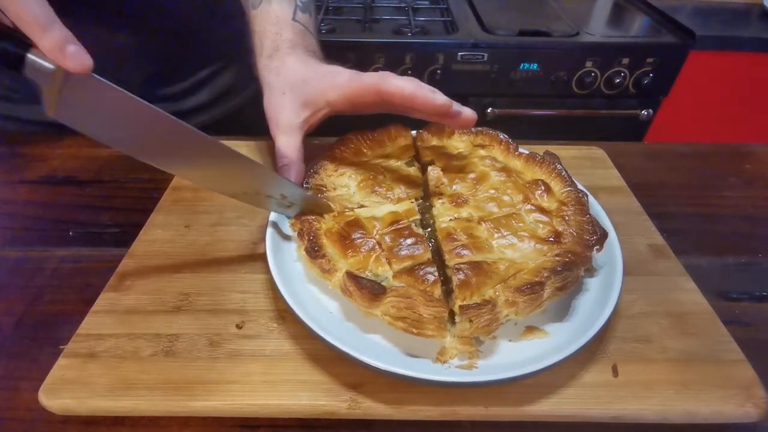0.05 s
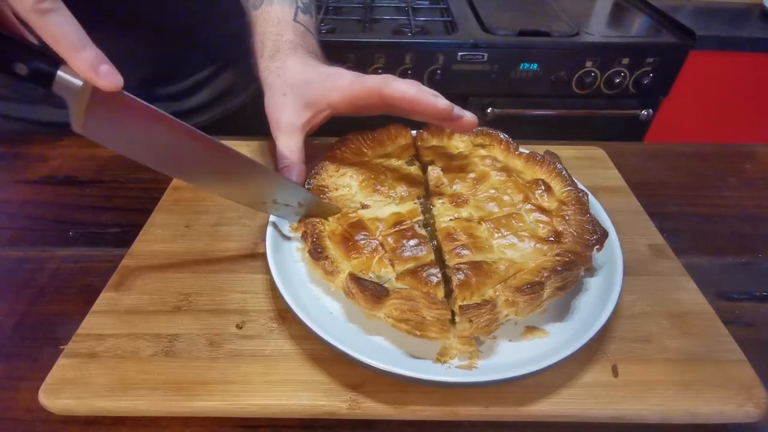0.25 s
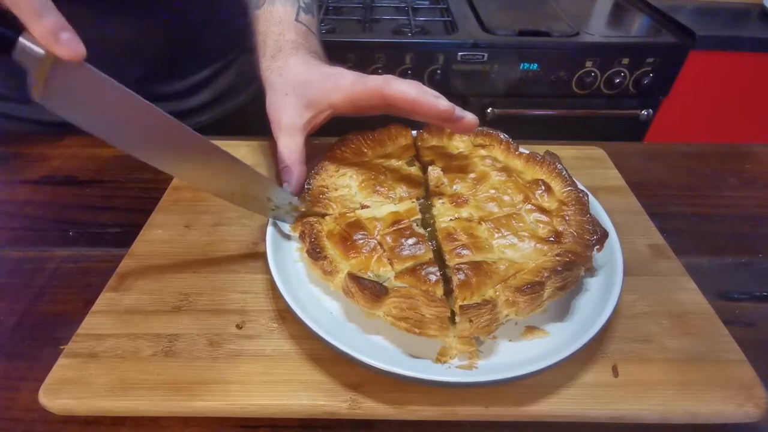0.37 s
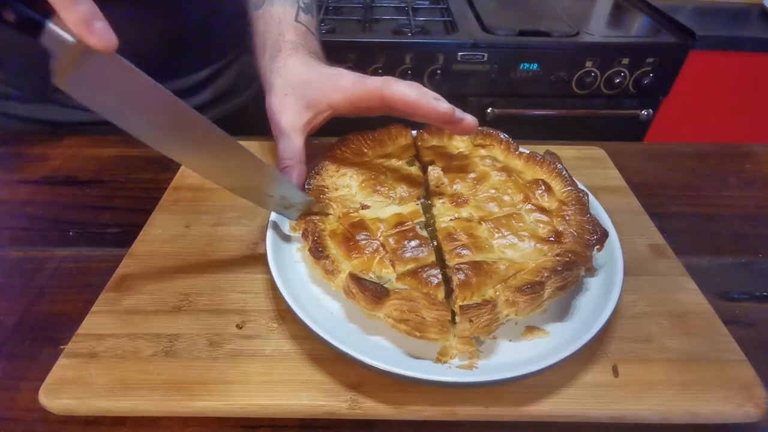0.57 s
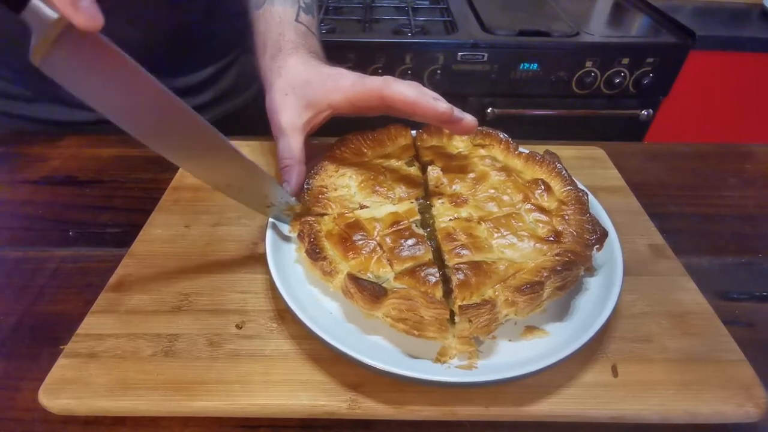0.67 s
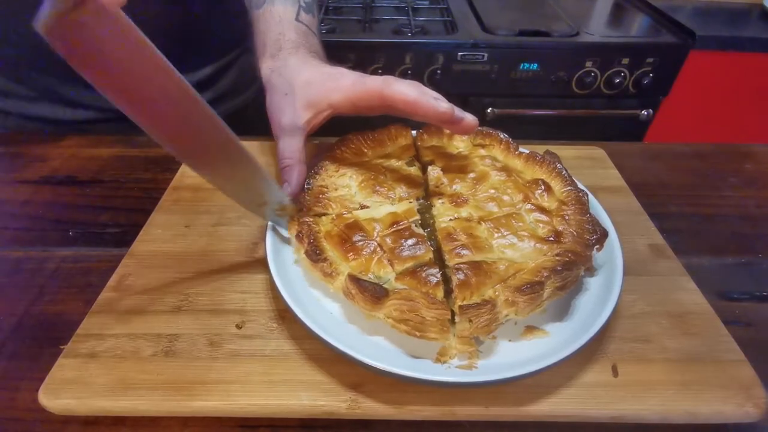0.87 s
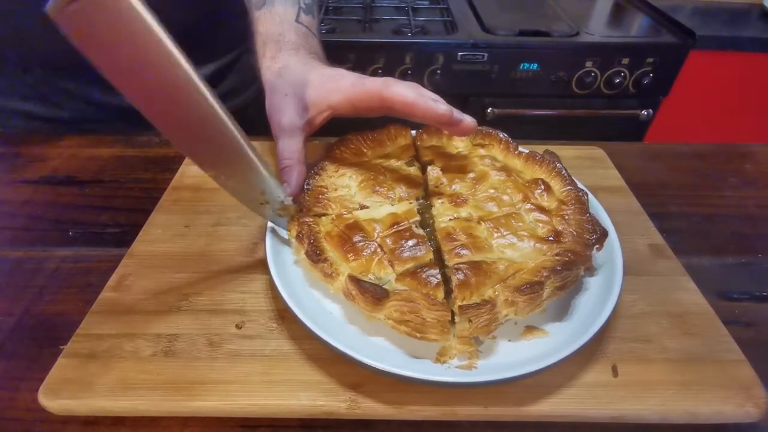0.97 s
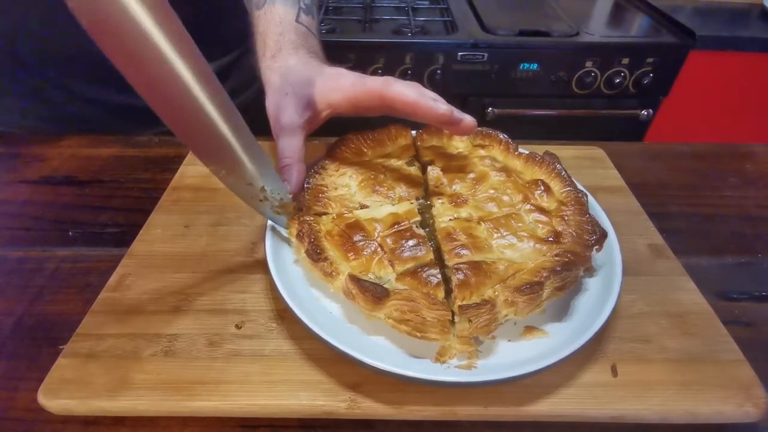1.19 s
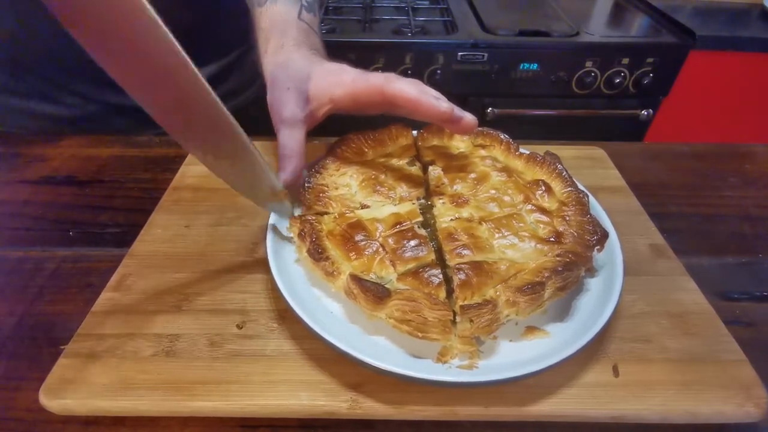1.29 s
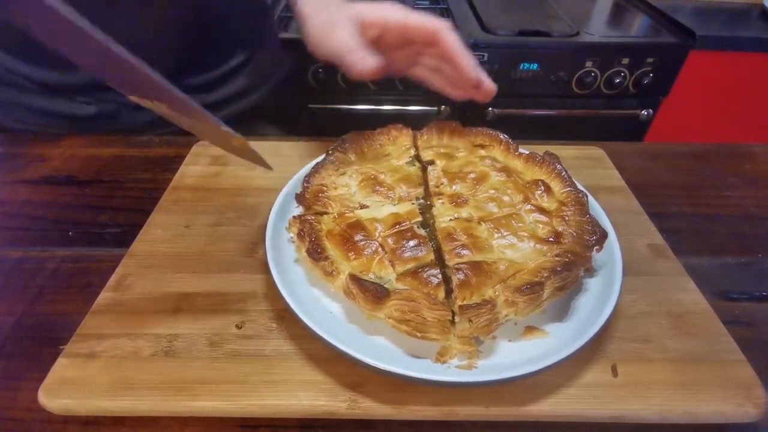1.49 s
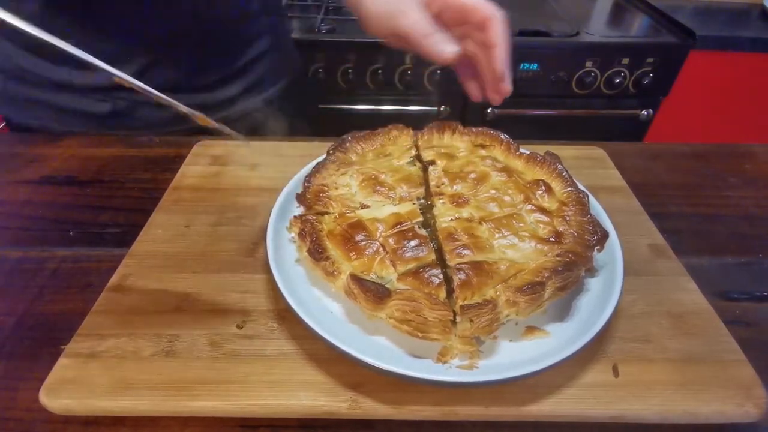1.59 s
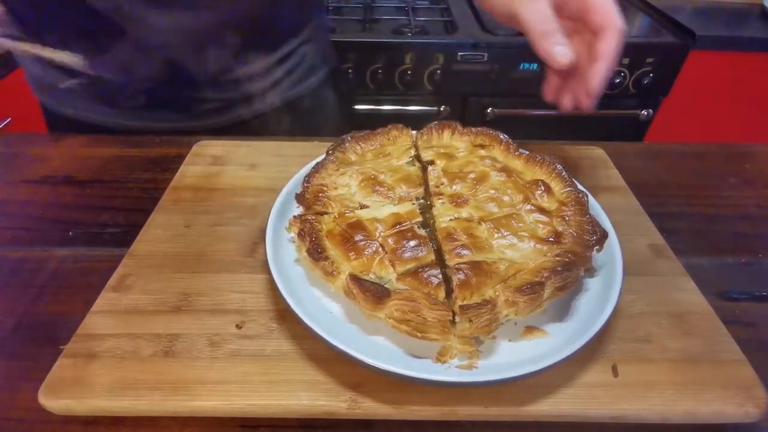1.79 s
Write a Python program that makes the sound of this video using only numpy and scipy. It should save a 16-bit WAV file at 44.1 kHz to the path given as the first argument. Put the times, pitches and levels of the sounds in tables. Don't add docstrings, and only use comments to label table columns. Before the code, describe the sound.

Knife cutting a flaky pie on a ceramic plate, close stereo in a reverberant kitchen. A tiny tick at 0.08 s, crust crackles around 0.2 s, dull plate bumps at 0.25-0.45. A light touch at 0.5, a sharp clink at 0.56, then uneven gritty scraping to 1.0, with a blunt bump at 0.85. Crunch and hard clack at 1.01, fading; faint flakes near 1.4 over low rumble and hum.

```python
import sys
import numpy as np
from scipy import signal
from scipy.fft import rfft, irfft, next_fast_len
from scipy.io import wavfile
from scipy.ndimage import map_coordinates

SR = 44100
rng = np.random.default_rng(int(sys.argv[2]) if len(sys.argv) > 2 else 0)


def to_linear_factor(level_db):
    exponent = np.asarray(level_db, float) / 20
    return 10 ** exponent


def generate_wav(sig):
    pcm = np.round(np.clip(np.atleast_2d(sig).T, -1, 1) * 32767).astype(np.int16)
    wavfile.write(sys.argv[1], SR, pcm)


N = 81585

# frequency in Hz, level struck near the rim in dB,
# level struck further in in dB, t60 in seconds, left over right in dB.
PLATE_MODES = [(284.5, -12.5, -26.5, 0.16, 2.5), (630, -23, -8.5, 0.12, -4.5), (568.4, 0, -10, 0.09, -4),
               (716, 3.5, -5.5, 0.14, -3.5), (722, -6, 0.5, 0.065, 0), (878, -26, -10, 0.024, -10.5),
               (992, 2.5, -42, 0.025, -2.5), (1622, -5.5, -3.5, 0.091, -2), (1866, 6.5, -9.5, 0.045, 2),
               (1972, 4, -4, 0.036, -13.5), (2100, -9.5, 4.5, 0.074, 1), (2427, 4.5, -7, 0.026, -8),
               (3020, 3.5, -5, 0.015, -12.5), (2880, 5, -8.5, 0.04, -2), (3161, -3.5, -9.5, 0.1, 12.5)]
# frequency in Hz, level in dB,
# t60 in seconds, left over right in dB.
JAMMED_MODES = [(218, -12.5, 0.02, 5), (626.8, -6.5, 0.11, -4.5), (694.3, -2.5, 0.083, -7.5),
                (786, -0.5, 0.051, -3.5), (791, -1.5, 0.026, 0), (1130, -26, 0.028, -4),
                (1593, -4.5, 0.055, -2), (1815, 5, 0.015, 0), (1919, -5.5, 0.058, -8),
                (2170, 0, 0.03, -7.5), (2320, -3.5, 0.066, -4.5), (2760, 0.5, 0.01, 6),
                (3012, -2, 0.027, -14.5), (3140, 0.5, .03, -1)]
# frequency in Hz, level in an early hold in dB, level in a late hold in dB,
# t60 in seconds, left over right in dB.
BLADE_MODES = [(3960, 2.5, -8, 0.01, -15), (4600, 9, -32.5, 0.018, 1.5), (4765, -6.5, 3, 0.022, 7),
               (6010, -4.5, -14.5, 0.045, -6), (6280, -6.5, -16.5, 0.04, -6.5),
               (7710, -21.5, -29.5, 0.025, -22), (9530, -7.5, -20.5, 0.03, -1),
               (11300, -12.5, -23, 0.028, -12), (12900, -12, -15, .025, -9.5),
               (13450, -13.5, -14.5, .025, -4.5), (15100, -11.5, -11.5, .025, -2.5)]
# frequency in Hz, level in dB, t60 in seconds.
BOARD_MODES = [(143.4, -31.5, .1), (200, -22, 0.15)]
# frequency in Hz, level in dB.
CLATTER_SPECTRUM = [(300, -34.5), (600, -4), (1000, -19), (1330, -31), (1900, 5.5), (3150, 1), (3500, -5),
                    (6800, -14.5), (8000, -48)]
CLATTER_DB, CLATTER_T60 = -2.5, 0.11
DULL_DB = 21
LAG_S, STRAY_HZ = -0.00013, 1450
# start in seconds, force in dB, contact in ms, blade over plate in dB,
# place from 0 at the rim to 1 inside.
KNOCKS = [
    (0.496, -28, 0.14, -6, 0.89),
    (.505, -44, 0.088, -30, 0.37),
    (.558, -22.5, 0.037, -3.5, 0.039),
    (0.5675, -30, .13, -16.5, 0.18),
]
# start in seconds, force in dB, contact in ms,
# blade over plate in dB.
BREAKS = [
    (1.0115, -19.5, 0.032, 1),
    (1.038, -27.5, 0.15, -17.5),
]
# time in seconds, pressure in dB, contact in ms,
# bearing point from 0 at the heel to 1 at the tip.
DRAG_COURSE = [(.48, -110, .07, .3), (.5, -72.5, 0.067, 0.29), (.52, -48, 0.079, 0.25),
               (.56, -42.5, 0.3, 0.32), (.68, -38.5, 0.13, 0), (.74, -32, 0.24, 0.74),
               (.78, -44.5, 0.095, 0.16), (.835, -39, 0.86, 0.5), (.9, -48, 0.68, 0.85),
               (.94, -45, 0.6, 0.7), (.965, -30, 0.6, .95), (.99, -33, .55, .96), (1.01, -36, 0.4, 0.76),
               (1.06, -50, 0.07, 0), (1.2, -68, 0.092, 0.5), (1.3, -86, 0.13, 0.75)]
DRAG_CATCHES_PER_S, DRAG_SPREAD_DB = 900, 3.5
DRAG_BLADE_DB, DRAG_CLATTER_DB = -5.5, 1
# frequency in Hz, heel level in dB, # tip level in dB,
# t60 in seconds. With the heel down a mode sounds at 1.5 times the heel level
ROCKING_MODES = [(208, -25, -20, 0.019), (260, -15, -18.5, 0.076), (622, -10, -2, 0.053),
                 (697, -2, -9, 0.051), (726, -13.5, -2, 0.044), (1080, -6, -7, 0.038),
                 (1150, -5.5, -18, 0.02), (1618, -2.5, -3.5, 0.016), (1647, -12.5, 4.5, 0.026),
                 (1840, -17, -5, 0.028), (1950, -23, -10.5, 0.064), (2955, -21, -6, 0.033),
                 (4030, -19.5, -6.5, .014)]
# start in seconds, force in dB, pitch in Hz, rise in ms, scuff in dB.
SHOVES = [(.2462, -18.5, 701.6, 3, 2), (.279, -24.5, 703, 4, -10), (.298, -28.5, 693, 4, -15.5),
          (.422, -32, 710, 14, -24.5), (.455, -52.5, 715, 8, -20), (.33, -37, 712, 6, -20.5),
          (.832, -55.5, 780, 4, -17), (.8525, -14.5, 748, 16, -24), (.872, -45, 700, 4, -15.5),
          (.886, -29.5, 707, 5, -22.5), (.918, -42, 695, 5, -20.5), (.94, -22.5, 765, 14, -24)]
# frequency over the pitch, level in dB, t60 in seconds,
# left over right in dB.
SHOVED_MODES = [(0.382, -15.5, .05, -2), (.78, -7.5, 0.0406, -3.5), (0.971, -3, 0.029, -1.5),
                (1.002, 0, .075, -5.5), (1.04, -12.5, 0.02, -0.5), (1.44, -20, .03, -3.5)]
# frequency in Hz, level in dB.
SCUFF_SPECTRUM = [(250, -13.5), (550, -8.5), (1150, -10.5), (1350, -12), (1650, 2.5), (2300, 1.5),
                  (3100, -14), (8000, -33)]
SCUFF_MS, SCUFF_T60 = 0.016, 0.052
# time in seconds, strength in dB.
CRUSH_COURSE = [(0, -64), (.19, -68), (.225, -49), (.3, -48.5), (.35, -80.5), (.43, -56), (.49, -77),
                (.548, -48), (.6, -57.5), (.7, -67), (.77, -53), (.8, -61.5), (.92, -75.5), (.985, -45.5),
                (1.04, -52.5), (1.3, -74), (1.4, -70), (1.46, -80.5)]
FLAKES_PER_S, FLAKE_SPREAD_DB, FIZZ_SHARE = 4500, 4.5, 1
# start in seconds, peak in dB.
SNAPS = [(0.1599, -51), (0.2028, -45), (0.2048, -50), (0.22, -47.5), (0.2259, -53), (0.2327, -43),
         (.2365, -42), (.375, -48), (0.5424, -45), (0.5462, -38), (0.7336, -46), (0.7374, -46),
         (0.772, -36), (0.9522, -47.5), (0.9832, -37.5), (0.9864, -37), (1.367, -52), (1.3924, -48),
         (1.4157, -51)]
SNAP_T60 = .012
# frequency in Hz, level in dB.
CRUST_SPECTRUM = [(1200, -30), (2500, 3.5), (4000, 1.5), (6000, 1), (8000, -16), (11000, 0), (13500, -15),
                  (16000, -14)]
# frequency in Hz, level in dB.
TIP_MODES = [(3000, -20), (4651, -14.5), (5480, -11.5), (11420, -24), (15100, -30)]
TICK_S, TICK_DB, TIP_T60 = .0752, -42.5, .1
# frequency in Hz, t60 in seconds, level in dB.
KITCHEN = [(154, 1, -3.5), (754, 0.5, -4.5), (2100, 0.56, -1.5), (5000, .5, -6.5), (11940, 0.28, -3.5)]
# frequency in Hz, left-right likeness.
ECHO_ALIKE = [(100, 0.57), (700, 1), (1500, 0.31), (4000, 0.073)]
WARE_WET_DB, SHOVE_WET_DB, CRUST_WET_DB = -1.55, -3.5, -1.5
WALL_S = .006
# frequency in Hz, level in dB.
RUMBLE = [(25, -4), (60, 1.5), (130, -10.5), (260, -16.5), (500, -63)]
# time in seconds, effort in dB.
HANDS = [
    (0, -76),
    (.22, -80),
    (.28, -61.5),
    (.45, -68.5),
    (.6, -72.5),
    (1.05, -73.5),
    (1.28, -66.5),
    (1.35, -91),
]
# frequency in Hz, level in dB.
AIR = [(30, -66.5), (90, -77.5), (350, -76.5), (800, -82), (2000, -88), (5000, -95.5), (8000, -103.5),
       (15000, -100)]
# frequency in Hz, left-right likeness.
AIR_ALIKE = [(60, 0.11), (240, 0.78), (950, 0), (3770, 0.0), (15000, 0.07)]
# frequency in Hz, rms level in dB.
HUM = [(148, -70.5), (340, -74)]
# resonance in Hz, width in Hz, lift in dB, roll-off in Hz.
PORTS = [(5150, 2000, 15, 19000), (10920, 4470, 20, 28000)]
TOP_HZ = 15850


def unit(x):
    return x / np.sqrt(np.mean(x ** 2) + 1e-20)


def along(points, hz):
    f, v = np.transpose(points)
    return np.interp(np.log(hz + 1), np.log(f + 1), v)


def curves(rows):
    s, *cols = np.transpose(rows)
    return [np.interp(np.arange(N) / SR, s, c) for c in cols]


def filtered(x, response):
    m = next_fast_len(N + SR // 2)
    return irfft(rfft(x, m) * response(np.fft.rfftfreq(m, 1 / SR)), m)[..., :N]


def causal(points):
    cep = irfft(np.log(to_linear_factor(along(points, np.fft.rfftfreq(2048, 1 / SR)))))
    cep[1:1024] *= 2
    cep[1025:] = 0
    return irfft(np.exp(rfft(cep)))[:512]


def spikes(rate, spread_db):
    u = rng.random((3, N))
    sign = np.sign(u[1] - .5)
    size = to_linear_factor(-spread_db * np.log(1 - .98 * u[2]))
    return unit((u[0] < rate / SR) * sign * size)


def ringing(modes, place, contact_ms, attack_s=.001):
    t = np.arange(SR // 4) / SR
    hz, near, far, t60, pan = np.transpose(modes)[:, :, None]
    place = np.clip(place, 0, 1)
    level = (1.5 - place) * near + place * far - 60 * t / t60
    size = to_linear_factor(level) / (1 + (hz * contact_ms / 500) ** 4) ** .5
    rise = 1 - np.exp(-t / max(attack_s, contact_ms / 250))
    common = rng.normal(0, 0.51, hz.shape)
    stray = np.minimum(hz / STRAY_HZ, 1) * rng.normal(0, 0.92, (2, len(modes), 1))
    lag = np.array([-1, 1])[:, None, None] * np.pi * hz * LAG_S
    wave = np.sin(2 * np.pi * hz * t + common + stray + lag)
    ring = rise * np.sum(size * to_linear_factor(np.array([pan, -pan]) / 2) * wave, axis=1)
    return signal.lfilter(*signal.butter(2, hz.min() / SR, 'high'), ring)


def clatter(db, contact_ms, t60=CLATTER_T60, modes=CLATTER_SPECTRUM):
    t = np.arange(SR // 4) / SR
    rise = 1 - np.exp(-t / (.0012 + contact_ms / 200))
    noise = rng.standard_normal(len(t)) + 0.33 * rng.standard_normal((2, len(t)))
    burst = rise * to_linear_factor(db - 60 * t / t60) * noise
    colour = [(hz, level - DULL_DB * contact_ms * max(np.log2(hz / 900), 0)) for hz, level in modes]
    return signal.fftconvolve(burst, causal(colour)[None], axes=1)[:, :len(t)]


def thump():
    return ringing([(hz, db, db, t60, 2) for hz, db, t60 in BOARD_MODES], 0, 0.21)


def knocks():
    out = np.zeros((2, N + SR))
    jammed = [(hz, db, db, t60, pan) for hz, db, t60, pan in JAMMED_MODES]
    blows = [(PLATE_MODES, row[4], *row) for row in KNOCKS]
    blows += [(jammed, 0, *row, .95) for row in BREAKS]
    for plate, place, s, db, ms, blade_db, hold in blows:
        blow = ringing(plate, place, ms) + thump()
        blow += to_linear_factor(blade_db) * ringing(BLADE_MODES, hold, 0.06)
        blow += clatter(CLATTER_DB - 12 * ms ** 2, ms)
        out[:, round(s * SR):][:, :SR // 4] += to_linear_factor(db) * blow
    return out[:, :N]


def drag():
    db, ms, tip = curves(DRAG_COURSE)
    force = to_linear_factor(db) * spikes(DRAG_CATCHES_PER_S, DRAG_SPREAD_DB)
    sharp = np.clip((.65 - ms) / 0.58, 0, 1) ** 2
    tip = np.clip(tip, 0, 1)
    hard = ringing(PLATE_MODES, 0.57, 0.32) + clatter(DRAG_CLATTER_DB, 0.058)
    hard += to_linear_factor(DRAG_BLADE_DB) * ringing(BLADE_MODES, 0.22, 0.098)
    rocking = [tuple(row) + (-2,) for row in ROCKING_MODES]
    heel_ring, tip_ring = (ringing(rocking, place, 0.039) for place in (0, 1))
    parts = ((sharp, hard), ((1 - sharp) * (1 - tip), heel_ring), ((1 - sharp) * tip, tip_ring))
    out = np.zeros((2, N))
    for share, ring in parts:
        ring = ring / np.linalg.norm(ring[1])
        out += signal.fftconvolve((force * share)[None], ring, axes=1)[:, :N]
    return out


def tick():
    t = np.maximum(np.arange(N) / SR - TICK_S, 0)
    ring = sum(to_linear_factor(db - 60 * t / TIP_T60) * np.sin(2 * np.pi * hz * t) for hz, db in TIP_MODES)
    crack = (t > 0) * to_linear_factor(-3.0 - 60 * t / 0.0042) * np.diff(rng.standard_normal((2, N + 1)))
    return to_linear_factor(TICK_DB) * (ring + crack)


def shoves():
    out = np.zeros((2, N + SR))
    for s, db, pitch, rise_ms, scuff_db in SHOVES:
        modes = [(pitch * k, level, level, t60, pan) for k, level, t60, pan in SHOVED_MODES]
        push = ringing(modes, 0, .01, rise_ms / 2000) + to_linear_factor(-8.5) * thump()
        push += clatter(scuff_db, SCUFF_MS, SCUFF_T60, SCUFF_SPECTRUM)
        out[:, round(s * SR):][:, :SR // 4] += to_linear_factor(db) * push
    return out[:, :N]


def crust():
    db, = curves(CRUSH_COURSE)
    fizz = FIZZ_SHARE * rng.standard_normal((2, N))
    force = to_linear_factor(db - 4.5) * (spikes(FLAKES_PER_S, FLAKE_SPREAD_DB) + fizz)
    t = np.arange(400) / SR
    fade = to_linear_factor(-60 * t / SNAP_T60) * (1 - np.exp(-t * 3000))
    for s, peak_db in SNAPS:
        snap = fade * np.diff(rng.standard_normal((2, len(t) + 1)))
        force[:, round(s * SR):][:, :len(t)] += to_linear_factor(peak_db + 1.5) * snap
    return signal.fftconvolve(force, causal(CRUST_SPECTRUM)[None], axes=1)[:, :N]


def kitchen(x, count=6):
    out, part = np.zeros((2, N)), np.arange(N) * count // N
    decay, colour = np.array(KITCHEN)[:, :2], np.array(KITCHEN)[:, ::2]
    for k in range(count):
        hz, t, (a, b) = signal.stft(rng.standard_normal((2, SR * 3 // 4)), SR, nperseg=256)
        turn = np.arccos(np.clip(along(ECHO_ALIKE, hz), -1, 1))[:, None] / 2
        z = np.array([a * np.cos(turn) + b * np.sin(turn), a * np.cos(turn) - b * np.sin(turn)])
        z = z * to_linear_factor(-60 * t / along(decay, hz)[:, None])
        tail = signal.istft(z, SR, nperseg=256)[1]
        tail = tail * (1 - np.exp(-np.arange(tail.shape[1]) / SR / 0.0052))
        tail = np.pad(tail / np.linalg.norm(tail[0]), ((0, 0), (round(WALL_S * SR), 0)))
        out += signal.fftconvolve(x * (part == k), tail, axes=1)[:, :N]
    return filtered(out, lambda f: to_linear_factor(along(colour, f)))


def worktop():
    db, = curves(HANDS)
    lumps = map_coordinates(rng.standard_normal(32), [np.arange(N) / SR * 14])
    rumble = unit(filtered(rng.standard_normal(N), lambda hz: to_linear_factor(along(RUMBLE, hz))))
    return to_linear_factor(db + 3 * lumps + np.array([[3], [-3]])) * rumble


def room_tone():
    def mid_side(hz):
        turn = np.arccos(np.clip(along(AIR_ALIKE, hz), -1, 1)) / 2
        return to_linear_factor(along(AIR, hz) + 21.5) * [np.cos(turn), np.sin(turn)]

    mid, side = filtered(rng.standard_normal((2, N)), mid_side)
    t = np.arange(N) / SR

    def slow():
        return map_coordinates(rng.standard_normal(16), [t * 6])

    hum = sum(to_linear_factor(db - 4.5 + slow()) * np.sin(2 * np.pi * hz * t + 0.52 * slow()) for hz, db in HUM)
    return np.array([mid + side, mid - side]) + hum


def scene():
    ware, blunt, flakes = knocks() + drag() + tick(), shoves(), crust()
    wet = kitchen(to_linear_factor(WARE_WET_DB) * ware + to_linear_factor(SHOVE_WET_DB) * blunt + to_linear_factor(CRUST_WET_DB) * flakes)
    return ware + blunt + flakes + wet + room_tone() + worktop()


def band_limit(x):
    return signal.sosfilt(signal.butter(12, 16350, fs=SR, output="sos"), x)


def record(dry):
    def port(f, centre, width, lift_db, roll_hz):
        resonance = 1j * f * width / (centre * centre - f * f + 1j * f * width)
        return 1 / (1 + 1j * f / roll_hz) + to_linear_factor(lift_db) * 0.47 * resonance

    def response(f):
        return np.array([port(f, *row) for row in PORTS]) * (f < TOP_HZ)

    return band_limit(filtered(dry, response))


dry = scene()
out = record(dry)
generate_wav(out)
```